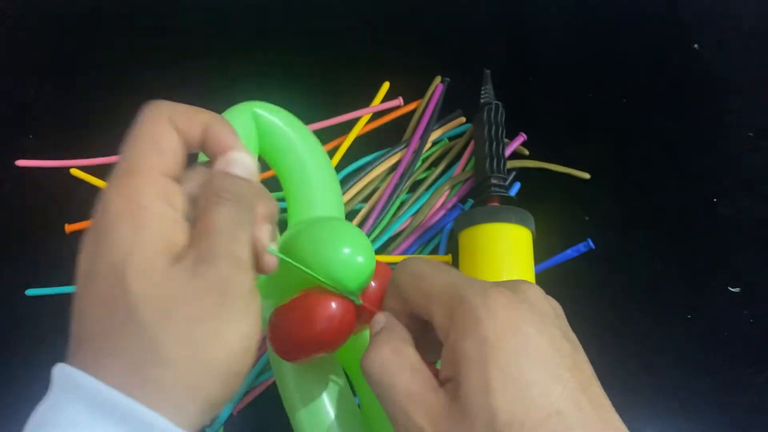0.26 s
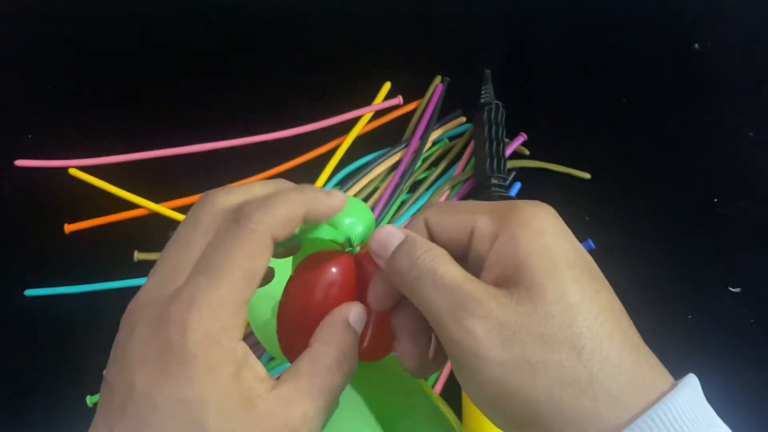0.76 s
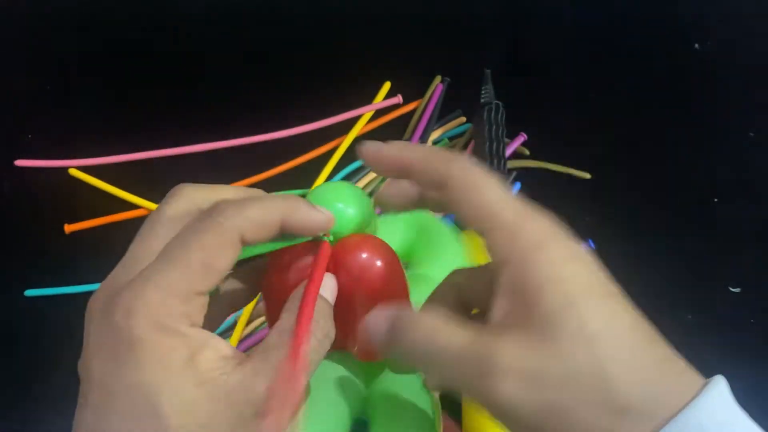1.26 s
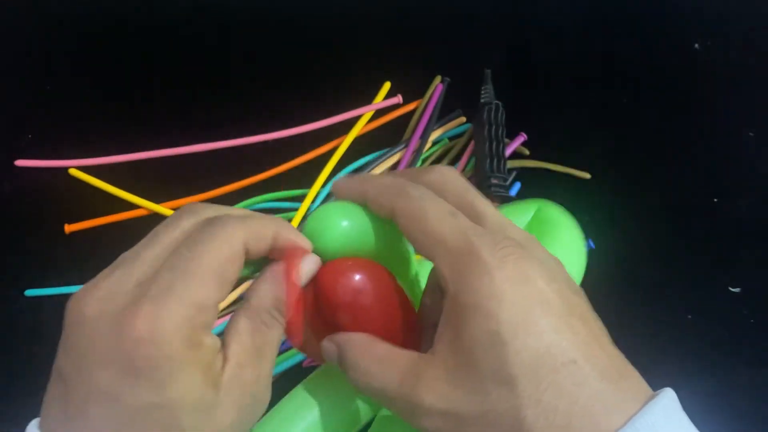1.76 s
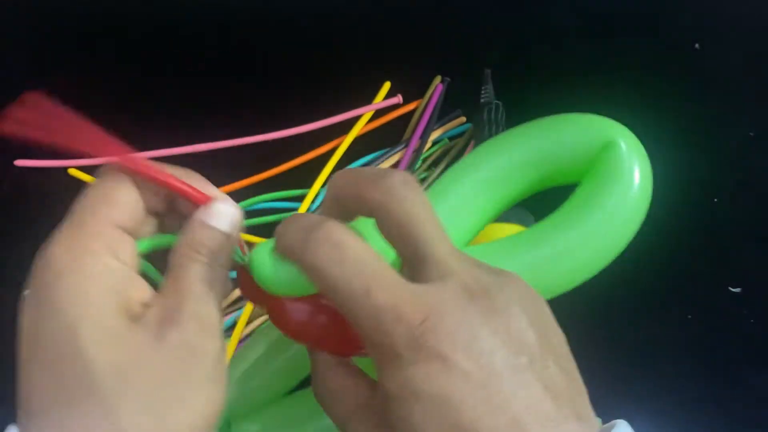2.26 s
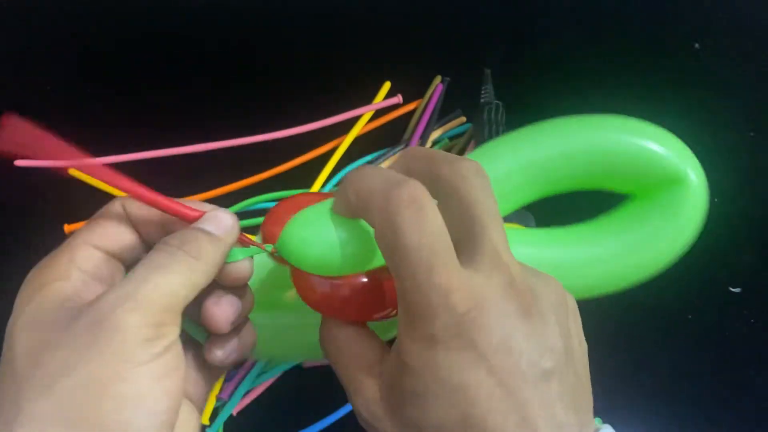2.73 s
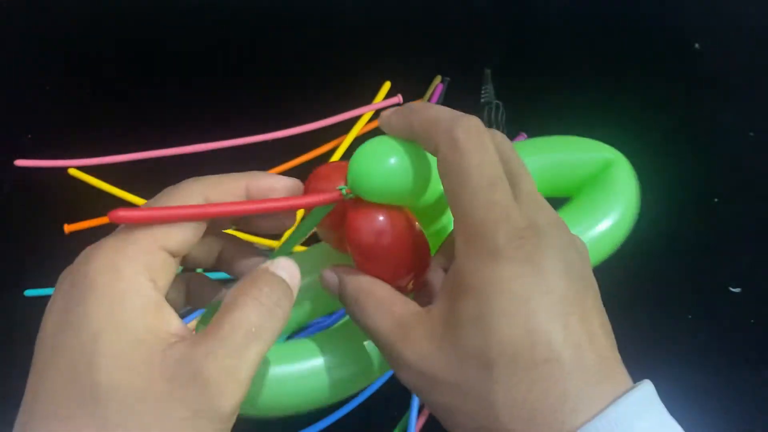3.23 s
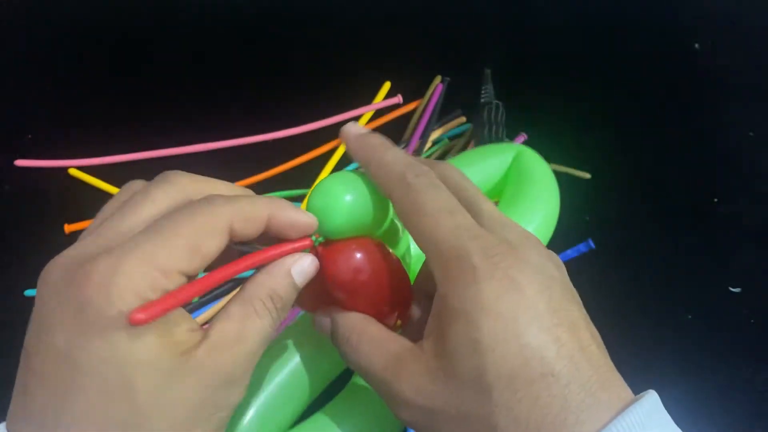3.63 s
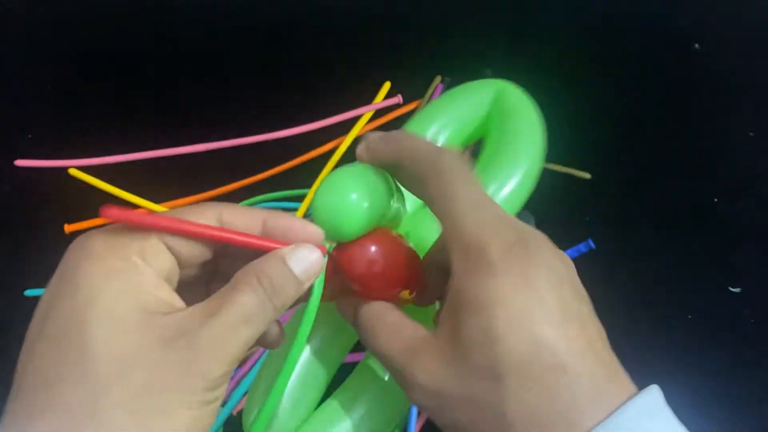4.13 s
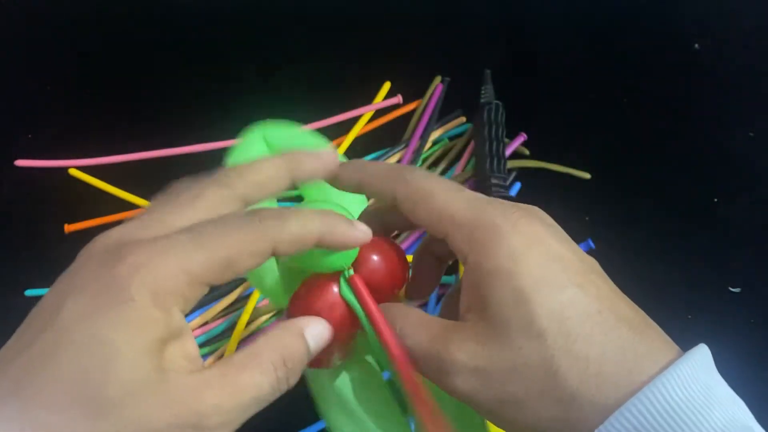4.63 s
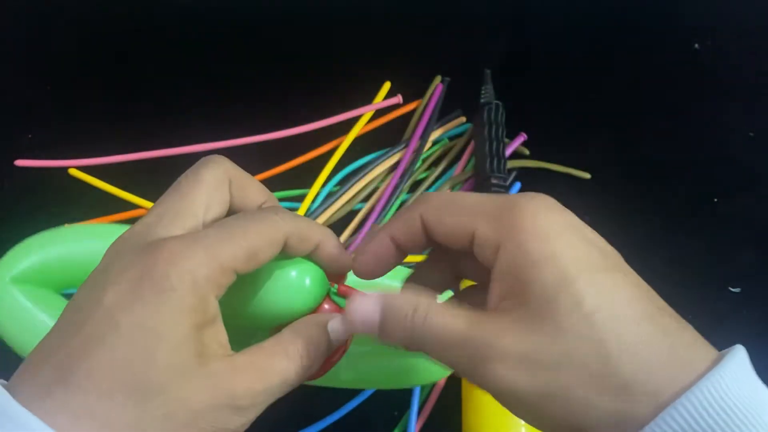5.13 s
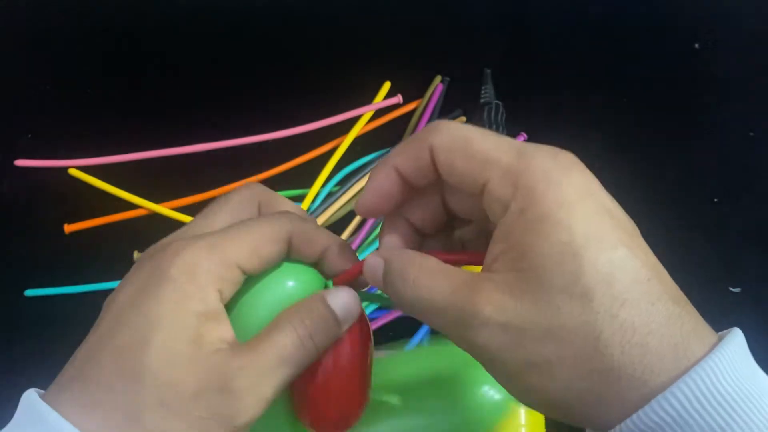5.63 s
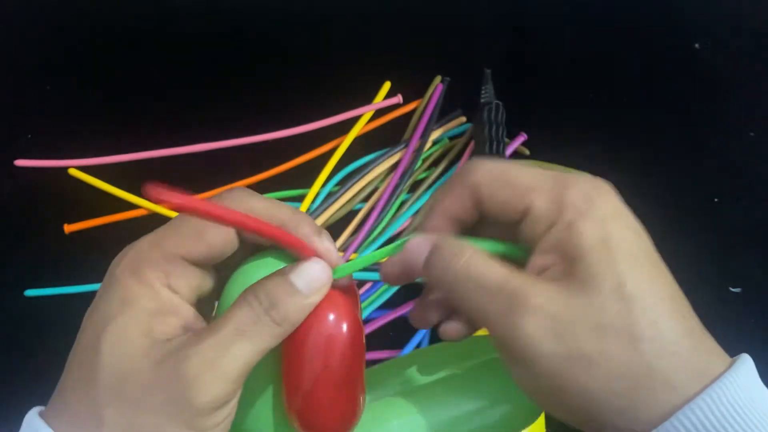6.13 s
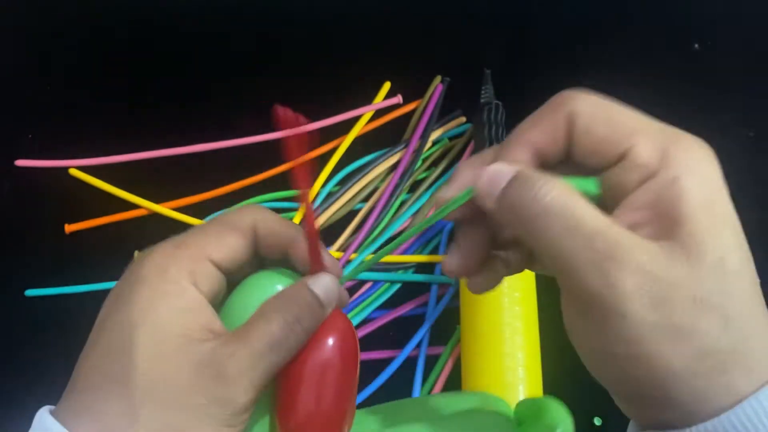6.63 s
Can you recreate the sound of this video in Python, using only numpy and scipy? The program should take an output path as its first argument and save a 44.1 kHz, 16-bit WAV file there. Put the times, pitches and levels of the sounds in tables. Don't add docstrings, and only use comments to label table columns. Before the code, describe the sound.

Hands twist inflated balloons close to the microphone: sharp rubbery cracks, drum-like boings, squeaky rubbing hisses and one brief quickening groan.

```python
import sys
import numpy as np
from scipy import signal
from scipy.fft import rfft, irfft
from scipy.io import wavfile
from scipy.ndimage import map_coordinates

SR = 44100
rng = np.random.default_rng(int(sys.argv[2]) if len(sys.argv) > 2 else 0)


def store_pcm(level_fs):
    pcm = np.round(np.clip(level_fs, -1, 1) * 32767).astype(np.int16)
    wavfile.write(sys.argv[1], SR, np.atleast_2d(pcm).T)


def how_loud(loudness_db):
    steps = np.asarray(loudness_db, float) / 20
    return 10 ** steps


N = 303849
HZ = np.maximum(np.fft.rfftfreq(N, 1 / SR), 1)

# [multiple of ring pitch, level/dB]
SKIN_MODES = [(0.499, -11.5), (.72, -8), (1.001, -1.5), (1.3, -1.5), (1.7, -2), (2.2, -1.5), (2.9, -3),
              (3.8, -4)]


def at_hz(points, hz):
    table_hz, table_db = np.transpose(points)
    return np.interp(np.log(hz), np.log(table_hz), table_db)


def in_time(rows):
    s, *columns = np.transpose(rows)
    return [np.interp(np.arange(N) / SR, s, column) for column in columns]


def rms_one(x):
    return x / np.sqrt(np.mean(x ** 2) + 1e-20)


def coloured(x, spectrum):
    return rms_one(irfft(rfft(x) * how_loud(at_hz(spectrum, HZ)), N))


def drift(rate_hz):
    r = np.exp(-2 * np.pi * rate_hz / SR)
    return rms_one(signal.lfilter([1], [1, -2 * r, r * r], rng.standard_normal(N)))


def add(out, s, sound):
    i = round(s * SR)
    out[..., i:i + sound.shape[-1]] += sound[..., :N - i]


def rubbing():
    # [t/s, level/dB]
    creak_curve = [(0.0, -71), (0.17, -81.5), (0.52, -57), (1.06, -66.5), (1.36, -59.5), (1.7, -63),
                   (2.0, -54.5), (2.3, -72.5), (3.07, -56.5), (3.27, -74.5), (3.56, -73.5), (4.14, -58),
                   (4.62, -67), (4.86, -61.5), (5.3, -68), (5.57, -56.5), (5.76, -69), (6.89, -71.5)]
    # [f/Hz, level per Hz/dB]
    creak_colour = [(120, -26.5), (200, 1.5), (350, 0), (650, -4), (1100, -5.5), (1800, -9), (3000, -16.5),
                    (5000, -27.5)]
    # [f/Hz, level per Hz/dB]
    hiss_colour = [(900, -18), (1800, 13.5), (2800, 9), (4500, 11), (7000, 1), (10000, -1.5), (13000, -4),
                   (16000, -8.5)]
    # [start t/s, length/s, hiss level/dB, treble over hiss/dB]
    strokes = [(0, 0.081, -66, -4), (0.067, 0.053, -69, 6), (0.186, 0.16, -87, -4),
               (0.595, 0.15, -75, 19.5), (0.868, 0.17, -63, -6), (0.995, 0.064, -66, 2),
               (1.198, 0.081, -57.5, 11), (1.232, 0.093, -53.5, 2), (1.416, 0.22, -62, 11),
               (1.517, 0.14, -60.5, -17), (1.61, 0.22, -70.5, -18), (1.977, 0.086, -52, -1),
               (2.134, 0.16, -55, -2), (2.881, 0.17, -57.5, -8), (3.937, 0.11, -55, -14),
               (4.235, .12, -56.5, -0.5), (4.55, 0.073, -81, -5), (4.688, 0.37, -55, 5.5),
               (5.013, 0.26, -63, -17), (5.226, 0.45, -63.5, -5), (5.467, 0.33, -60, -15.5),
               (5.918, 0.14, -56, 1), (6.04, 0.1, -58, 11), (6.16, 0.27, -53, 8.5), (6.387, 0.2, -65, 9),
               (6.543, 0.11, -80, 4), (6.645, 0.083, -68.5, 18.5), (6.725, 0.19, -80, 11)]
    sizes = how_loud(4.5 * np.minimum(rng.exponential(1, N), 4)) * rng.choice([-1, 1], N)
    slips_per_s = 800 * how_loud(6 * drift(25))
    grains = sizes * (rng.random(N) < slips_per_s / SR)
    noise = rng.standard_normal((3, N))
    creak = coloured(grains + 0.16 * (noise[0] + 1.4 * noise[1:]), creak_colour)
    hiss = coloured(0.32 * grains + 0.99 * noise[1:], hiss_colour)
    treble = signal.sosfilt(signal.butter(2, 6500, "high", fs=SR, output="sos"), hiss)
    dull, bright = np.zeros((2, N))
    for s, length, hiss_db, treble_db in strokes:
        swell = np.sin(np.linspace(0, np.pi, round(length * SR))) ** 2.08
        add(dull, s, how_loud(hiss_db) * swell)
        add(bright, s, how_loud(hiss_db + treble_db) * swell)
    slide = dull * (hiss - treble) + bright * treble
    creak_db, = in_time(creak_curve)
    patchy = how_loud(3 * drift(14))
    return how_loud(creak_db) * patchy * creak + how_loud(3.7 * drift(33)) * slide


def rumble():
    # [t/s, rumble level/dB]
    arms_curve = [(0, -74), (.4, -66.5), (.95, -63.5), (1.7, -67), (1.85, -60), (2.9, -58.5), (3.1, -57),
                  (3.5, -67.5), (3.7, -60.5), (4.2, -65), (4.8, -62), (5.6, -67), (6.89, -72.5)]
    rumble_db, = in_time(arms_curve)
    noise = rng.standard_normal((3, N))
    low = coloured(noise[0] + noise[1:] / 5, [(25, -47.0), (45, 4.0), (60, -3.0), (73, 8.0), (86, -9.5),
                                              (110, -4.5), (160, -4.5), (300, -47.5)])
    return how_loud(rumble_db + 2.0 * drift(2.3)) * low


def still_air():
    # [f/Hz, level/dB]
    air_colour = [(150, -37.5), (260, -2.5), (384, -12.5), (757, -12.5), (2170, -41.5), (2660, -16.5),
                  (8000, -31), (15000, -53)]
    return how_loud(-79) * coloured(rng.standard_normal((2, N)), air_colour)


def all_slips():
    # [t/s, crack level/dB, ring level/dB, ring f/Hz]
    snaps = [(0.355, -21.5, -33.5, 1200), (0.3974, -28.5, -35.5, 800), (0.4135, -19, -23.5, 608),
             (0.4378, -25.5, -44.5, 333), (0.8274, -29, -29.5, 644), (1.7839, -22.5, -22.5, 1240),
             (1.8176, -27, -37.5, 830), (1.8543, -25.5, -39, 543), (2.15, -26, -30.5, 864),
             (2.2135, -29, -31, 630), (2.3305, -16, -25, 768), (2.5249, -32, -22.5, 1320),
             (2.6317, -30.5, -21, 1227), (2.6397, -29.5, -27.5, 400), (2.7717, -31.5, -31, 917),
             (2.8264, -24.5, -25.5, 980), (2.8776, -21.5, -39, 428), (3.1018, -28.5, -31.5, 996),
             (3.1954, -24, -34.5, 739), (3.698, -26.5, -31, 940), (3.7485, -23, -32, 1090),
             (3.9404, -25.5, -29.5, 549), (4.059, -21.5, -27.5, 800), (4.23, -11.5, -20, 745),
             (4.8855, -32.5, -34, 1510), (4.8978, -24.5, -26.5, 883), (5.2193, -30.5, -37.5, 813),
             (5.292, -26, -39.5, 1110), (5.3257, -26, -39.5, 1000), (6.823, -27.5, -31.5, 903)]
    # [t/s, ring level/dB, ring f/Hz]
    middling = [(0.47, -37.5, 740), (0.5971, -37, 510), (0.6201, -40, 428), (0.9258, -33.5, 664),
                (0.9425, -33, 626), (1.128, -43, 606), (1.2655, -40.5, 327), (1.3884, -36, 843),
                (1.481, -37.5, 1090), (2.0179, -34.5, 318), (2.1041, -39.5, 1210), (2.1914, -34, 604),
                (2.23, -39.5, 472), (2.3674, -35.5, 1470), (2.5118, -31, 1490), (2.962, -37.5, 846),
                (2.9706, -36, 1220), (3.1469, -38, 647), (3.5784, -40.5, 793), (3.598, -36, 1200),
                (4.1873, -33, 1720), (4.44, -38, 847), (4.815, -36.5, 980), (4.9714, -38.5, 1720),
                (5.272, -37, 1200), (5.3105, -31.5, 1750), (6.285, -48.5, 660), (6.2922, -34.5, 365),
                (6.3035, -35, 293), (6.5072, -40.5, 1203)]
    # [t/s, ring level/dB, ring f/Hz]
    plucks = [(0.428, -32.5, 518), (0.5129, -41, 400), (0.7435, -33.5, 1040), (1.142, -60, 580),
              (1.2843, -44, 1200), (1.3093, -29, 1026), (1.3376, -40.5, 1110), (1.4502, -31.5, 1120),
              (1.796, -38, 1200), (1.9122, -39, 1020), (2.5684, -34.5, 740), (2.6207, -30, 893),
              (2.869, -37, 910), (2.8943, -37.5, 1410), (3.2022, -42, 694), (3.8448, -43.5, 1320),
              (4.0076, -31, 1100), (4.0162, -41, 1350), (4.0274, -35.5, 1000), (4.0391, -39, 800),
              (4.0474, -47, 685), (4.1493, -44.5, 400), (4.7997, -44, 1320), (5.403, -47, 670),
              (5.354, -42.5, 806), (5.7376, -40.5, 1330), (5.779, -50, 1230), (5.9045, -43, 1037),
              (6.135, -42.5, 863), (6.8417, -34.5, 950)]
    # [t/s, crack level/dB, ring f/Hz]
    dry_cracks = [(0.3294, -34, 2110), (0.4946, -38.5, 760), (0.6426, -47.5, 920), (0.7578, -30, 695),
                  (1.8892, -35.5, 453), (1.962, -36, 470), (1.9759, -31, 940), (1.9953, -34, 744),
                  (2.1997, -34, 637), (3.6917, -34, 743), (3.9594, -40, 900), (4.0233, -37, 1150),
                  (4.048, -30.5, 557), (4.3267, -31, 1010), (4.357, -42, 656), (4.4599, -32, 1290),
                  (4.541, -35, 1230), (4.5556, -28, 800), (5.0899, -36, 1000), (5.231, -41.5, 800),
                  (5.2637, -50.5, 715), (5.3787, -37, 746), (5.4282, -37.5, 600), (5.528, -34.5, 1140),
                  (5.683, -30, 995), (5.755, -41, 502), (5.975, -37, 900), (5.9802, -34.5, 810),
                  (6.0287, -35.5, 654), (6.0348, -31, 1206)]
    # [t/s, crack level/dB]
    ticks = [(0.0057, -44), (0.0577, -40), (0.169, -43), (0.325, -52), (0.339, -44), (0.5286, -42.5),
             (1.0549, -45), (1.207, -42), (1.51, -46), (1.9199, -39.5), (2.9, -47), (3.082, -44),
             (3.6522, -49), (4.536, -46.5), (5.0385, -43.5), (5.075, -39), (5.116, -38.5), (5.1217, -49),
             (5.762, -41.5), (5.773, -45.5), (5.9489, -40.5), (5.962, -47), (6.428, -46.5), (6.665, -47.5),
             (6.683, -49.5)]
    rows = list(snaps)
    rows += [(s, ring_db - 0.5, ring_db, hz) for s, ring_db, hz in middling]
    rows += [(s, ring_db - 10, ring_db, hz) for s, ring_db, hz in plucks]
    rows += [(s, crack_db, crack_db - 8.5, hz) for s, crack_db, hz in dry_cracks]
    rows += [(s, crack_db, crack_db - 5, 882) for s, crack_db in ticks]
    return sorted(rows)


def crack(hz, fade_s, noise):
    t = np.arange(noise.shape[1]) / SR
    shape = np.minimum(t / 0.000077, 1) * (np.exp(-t / fade_s) + 4.7 * np.exp(-t / 0.000084))
    band = signal.butter(1, [hz * .5, min(hz * 1.51, .45 * SR)], "band", fs=SR)
    burst = signal.lfilter(*band, (noise[0] + 3.9 * noise[1:]) * shape)
    return burst / np.sqrt(np.mean(burst[:, :60] ** 2))


def drum(hz, cycles, lag_cycles, sag, spread_db, chance):
    t, out = np.arange(4096) / SR, 0
    for (multiple, db), (detune, uneven, start_turn) in zip(SKIN_MODES, chance):
        f = hz * multiple * (1 + 0.097 * detune * (db < 0))
        u = t * f
        fade = how_loud(-60 * np.maximum(u - lag_cycles, 0) / cycles)
        swell = np.minimum(u / lag_cycles, 1) ** 2 * fade
        turns = u + sag * (1 - np.exp(-u / 2))
        level = how_loud(db + spread_db * uneven * (db < 0))
        out = out + level * swell * np.sin(2 * np.pi * (turns + start_turn))
    return out


def cavity(chance, t60):
    # [f/Hz, level/dB]
    pocket_modes = [(1150, -18), (1450, -2.5), (1720, 0.5), (2170, -6)]
    t, out = np.arange(1024) / SR, 0
    for (hz, db), (detune, uneven, phase) in zip(pocket_modes, chance):
        f = hz * (1 + 0.045 * detune)
        out = out + how_loud(db + 2 * uneven) * np.sin(2 * np.pi * (f * t + phase))
    return np.minimum(t / 0.00028, 1) * how_loud(-60 * t / t60) * out


def slips():
    out, last_s, spot = np.zeros((2, N)), -1, 0
    for s, crack_db, ring_db, ring_hz in all_slips():
        crack_hz = 4240 * how_loud(0.01 * (crack_db + 25.0))
        noise = rng.standard_normal((3, 512))
        chance = rng.standard_normal((len(SKIN_MODES), 3))
        kept = .9 if s - last_s < .025 else 0
        spot = kept * spot + np.sqrt(1 - kept ** 2) * chance
        last_s = s
        ring = drum(ring_hz, cycles=16.6, lag_cycles=2.05, sag=0.17, spread_db=1.5, chance=spot)
        add(out, s, how_loud(crack_db - 3.5) * crack(crack_hz, 0.0028, noise))
        add(out, s, how_loud(ring_db + 1.0) * ring)
        add(out, s, how_loud(0.61 * ring_db + 0.58 * crack_db - 4.0) * cavity(spot[::2], t60=0.037))
    return out


def knocks(table, cycles, lag_cycles, dull_hz):
    out = np.zeros(N)
    for s, db, hz in table:
        chance = rng.standard_normal((len(SKIN_MODES), 3))
        add(out, s, how_loud(db) * drum(hz, cycles, lag_cycles, sag=0.44, spread_db=2.2, chance=chance))
    return signal.lfilter(*signal.butter(2, dull_hz, fs=SR), out)


def table_bumps():
    # [t/s, peak level/dB, ring f/Hz]
    bumps = [(0.085, -49, 113), (0.832, -49, 130), (0.953, -44.5, 63), (1.264, -42.5, 121.5),
             (2.011, -40, 199), (2.334, -41.5, 71), (2.524, -36, 210), (2.639, -32.5, 108),
             (2.824, -38, 188), (4.864, -45.5, 107), (6.02, -42, 111), (6.304, -43, 140)]
    return knocks(bumps, 7.5, 1.09, dull_hz=400) * (0.83 + 0.21 * drift(70))


def skin_pops():
    # [t/s, peak level/dB, ring f/Hz]
    pops = [(0.09, -55, 368), (0.677, -49, 388), (0.958, -48, 643), (1.134, -51, 557), (1.227, -35.5, 1320),
            (2.021, -37.5, 446), (2.35, -65, 387), (3.423, -68.5, 605), (3.704, -39.5, 513),
            (4.853, -40, 664), (5.354, -45, 900), (5.385, -39.5, 748), (5.505, -46, 774), (6.223, -34, 602),
            (6.229, -35, 707), (6.234, -48.5, 518), (6.719, -57, 654)]
    return knocks(pops, 24.2, 2.5, dull_hz=1830)


def boing(hz, cycles, size=4096):
    u = np.arange(size) / SR * hz
    turns = u + 0.37 * (1 - np.exp(-u / 2))
    return how_loud(-60 * u / cycles) * np.minimum(u / 0.6, 1) * np.sin(2 * np.pi * turns)


def boings():
    # [t/s, peak level/dB, f/Hz, cycles to die]
    bubbles = [(0.399, -32, 850, 38), (0.4148, -10, 584, 16), (0.9265, -32, 660, 20), (1.132, -39, 610, 40),
               (1.380, -36.5, 520, 12), (1.38, -39, 1530, 50), (2.011, -16.5, 400, 6.3),
               (2.234, -37, 490, 12), (2.334, -23.5, 351, 15), (3.942, -41, 736, 19),
               (4.2865, -47, 800, 7.3), (4.442, -37, 830, 20), (5.3545, -34, 810, 12),
               (5.3865, -33, 840, 9), (6.136, -37.5, 950, 20), (6.138, -41.5, 520, 14),
               (6.229, -26, 750, 7.8), (6.235, -30.5, 548, 26), (6.2885, -35, 910, 25),
               (6.304, -26, 332, 5.8), (6.8245, -21.5, 897, 16.7)]
    # [t/s, peak level/dB, f/Hz]
    pings = [(.428, -29, 4630), (.470, -47, 4330), (.514, -50, 4000), (.621, -39, 4380),
             (1.0715, -52, 4800), (1.1296, -34.5, 4260), (1.132, -43.5, 4750), (1.1375, -52, 4600),
             (1.142, -49, 4600), (1.285, -51, 5600), (1.643, -52, 4500), (2.966, -36, 4600),
             (2.997, -41, 5000), (3.4255, -65, 6000), (3.441, -69, 6050), (3.671, -45, 5960),
             (4.0115, -39, 5000), (4.018, -36, 4800), (4.0254, -40.5, 4560), (4.030, -36, 4600),
             (4.0355, -37, 4700), (4.040, -34, 4530), (4.0455, -49, 4700), (4.050, -43.5, 4900),
             (4.16, -52, 5000), (4.503, -43, 1830), (4.847, -55, 5000), (4.869, -40, 5000),
             (5.168, -47, 5000), (5.231, -38, 4000), (5.402, -37, 4700), (6.01, -49, 5000),
             (6.257, -50, 6000), (6.408, -53, 4980)]
    # [t/s, peak level/dB, f/Hz]
    spikes = [(2.214, -26, 2500), (2.8265, -27, 3500), (2.8778, -17, 4400), (3.102, -24, 4200),
              (3.195, -23, 4400), (3.7485, -18, 4500), (4.059, -23, 4500), (4.3272, -30, 2200),
              (5.272, -26, 4500), (5.2912, -15, 4600), (5.310, -15, 4600), (5.3256, -13.5, 4600)]
    rows = list(bubbles)
    rows += [(s, db, hz, 39) for s, db, hz in pings]
    rows += [(s, db, hz, 5.4) for s, db, hz in spikes]
    out = np.zeros(N)
    for s, db, hz, cycles in rows:
        add(out, s, how_loud(db) * boing(hz, cycles))
    return out


def mutters(count=60):
    # [start t/s, length/s, level/dB, from f/Hz, to f/Hz]
    drags = [(0.439, 0.048, -49, 900, 800), (0.514, 0.051, -56, 700, 600), (0.712, 0.02, -52, 700, 700),
             (.912, 0.018, -41.5, 1480, 1480), (1.287, 0.045, -39.5, 1300, 1200),
             (1.39, .06, -59, 1600, 1600), (1.636, .015, -51, 1100, 900), (1.764, .03, -67, 910, 900),
             (2.965, 0.038, -46, 1200, 900), (5.33, 0.038, -49, 800, 900), (5.392, 0.092, -52, 760, 890),
             (3.698, 0.042, -44.5, 885, 594), (4.007, 0.057, -37.5, 1200, 990),
             (4.903, 0.069, -56, 1100, 1000), (6.272, 0.027, -50, 800, 885),
             (6.316, 0.019, -51.5, 600, 593)]
    slips_per_s = 450
    out = np.zeros(N)
    for s, length, db, from_hz, to_hz in drags:
        gap, size, tune = rng.random((3, count))
        late = np.cumsum(.5 + gap) / slips_per_s / length
        for x, a, b in zip(late[late < 1], size, tune):
            hz = (from_hz + (to_hz - from_hz) * x) * (0.737 + .45 * b)
            level = how_loud(db + 11.3 * a) * np.sin(np.pi * x)
            add(out, s + x * length, level * boing(hz, cycles=9.2, size=1024))
    return out


def groan():
    # [t/s, ring level/dB]
    groan_slips = [(5.5662, -34.5), (5.590, -33.5), (5.6062, -30.5), (5.6174, -31.5), (5.6257, -27),
                   (5.6337, -26.5), (5.64, -32), (5.6462, -23.5), (5.6537, -25), (5.6603, -24.5),
                   (5.6645, -30.5), (5.6688, -27), (5.6745, -34.5)]
    # [f/Hz, level/dB]
    twist_modes = [(490, -2.5), (800, -3), (1130, 3.5), (1340, 3.5), (1720, 3), (2060, 3), (3000, -7),
                   (4460, -9.5), (5200, -17), (6050, -18)]
    t, out = np.arange(1024) / SR, np.zeros((2, N))
    hz, db = np.transpose(twist_modes)[:, :, None]
    lag = 1.63 / hz
    fade = how_loud(db - 60 * np.maximum(t - lag, 0) / 0.01)
    modes = fade * np.minimum(t / lag, 1) * np.sin(2 * np.pi * hz * (t - lag))
    for s, ring_db in groan_slips:
        uneven = how_loud(rng.normal(0, 2.4, len(twist_modes)))
        add(out, s, how_loud(ring_db - 4) * (uneven @ modes))
        crack_db = 3.6 * (ring_db + 25.5) - 35
        add(out, s, how_loud(crack_db) * crack(3800, 0.0017, rng.standard_normal((3, 512))))
    return out


def room(x):
    # [f/Hz, time to fall 60 dB/s, level/dB]
    echo_bands = [(300, 0.22, -13.5), (1200, 0.2, -5.5), (4000, 0.31, -9), (11000, 0.29, -12)]
    t, edges = np.arange(SR // 2) / SR, [60, 600, 2400, 7000, 17000]
    tail = 0
    for (hz, t60, db), low, high in zip(echo_bands, edges, edges[1:]):
        band_filter = signal.butter(2, [low, high], "band", fs=SR, output="sos")
        band = signal.sosfilt(band_filter, rng.standard_normal((3, len(t))))
        alike = np.clip(350 / hz, 0, 1)
        both = alike * band[0] + np.sqrt(1 - alike ** 2 * 0.17) * band[1:]
        fade = how_loud(-60 * t / t60) * np.minimum(t / 0.0004, 1)
        tail = tail + how_loud(db) * both * fade / np.sqrt(np.sum(fade ** 2))
    return signal.fftconvolve(x[None], tail, axes=1)[:, :N]


def stirred(echo, samples=9.0, per_s=10.0):
    read = np.arange(N) + samples * drift(per_s)
    return np.array([map_coordinates(side, [read], order=3, mode="nearest") for side in echo])


def scene():
    blows = slips() + table_bumps() + skin_pops() + boings() + mutters() + groan()
    return rubbing() + rumble() + still_air() + blows + stirred(room(blows[0]))


def ports(x):
    # [f/Hz, phase/rad]
    left_leads = [(0, 0), (3000, 2.3), (3700, 1.5), (4200, -.5), (6500, 0), (8350, -np.pi),
                  (15600, -5 * np.pi), (17000, -5 * np.pi)]
    # [f/Hz, level/dB]
    left_louder = [(60, -3), (300, -2), (700, 2.5), (1290, 2), (2380, 4.5), (4400, 3.5), (8120, 3.5),
                   (15000, -3)]
    left, right = rfft(x)
    shared = np.clip((HZ - 5800) / 3000, 0, .975)
    right = shared * left + np.sqrt(1 - shared ** 2) * right
    phase = np.interp(HZ, *np.transpose(left_leads)) / 2
    tilt = how_loud(at_hz(left_louder, HZ) / 2) * np.exp(1j * phase)
    return np.array([left * tilt, right / tilt])


def low_pass(x):
    return signal.sosfilt(signal.butter(12, 16690, fs=SR, output="sos"), x)


def record(dry):
    colour = how_loud(at_hz([(20, -37.5), (45, 6.5), (8000, -6.0), (10000, 0.5), (11500, -3.5), (12050, 2),
                        (12600, -7.5), (15000, -5.5)], HZ))
    heard = np.tanh(irfft(ports(dry) * colour, N) * 2) / 2
    heard = irfft(rfft(heard) * (HZ < 16600), N)
    return low_pass(heard)


dry = scene()
out = record(dry)
store_pcm(out)
```